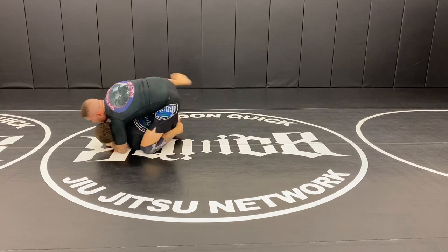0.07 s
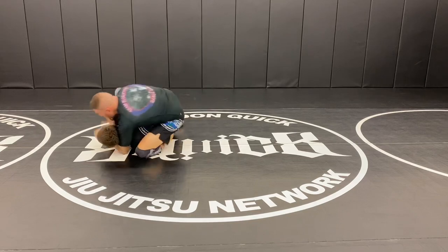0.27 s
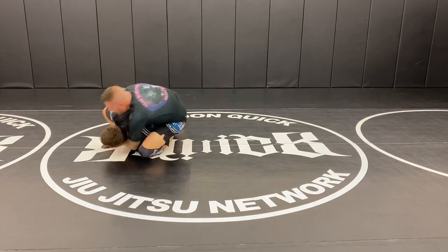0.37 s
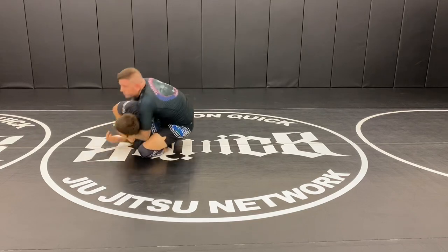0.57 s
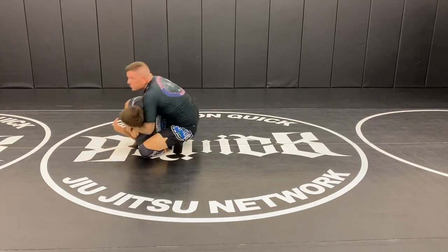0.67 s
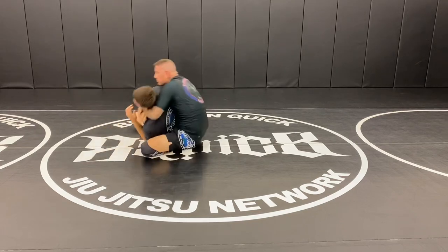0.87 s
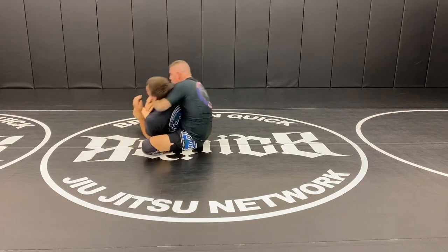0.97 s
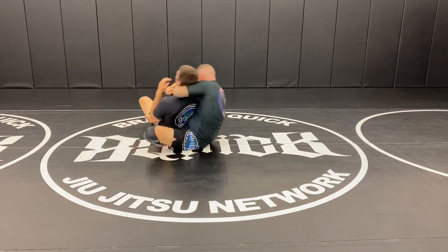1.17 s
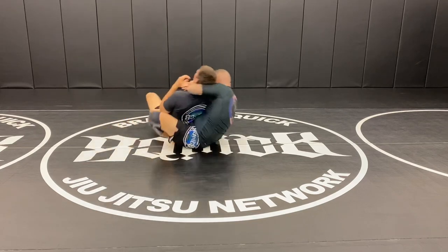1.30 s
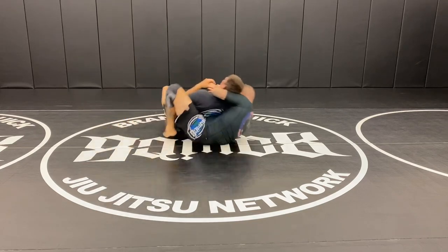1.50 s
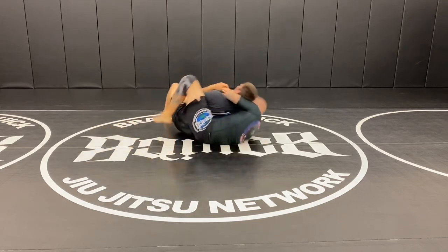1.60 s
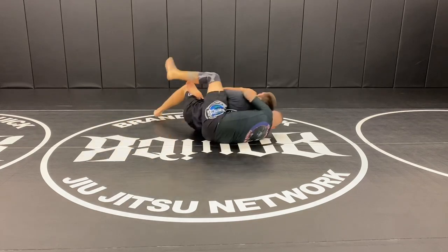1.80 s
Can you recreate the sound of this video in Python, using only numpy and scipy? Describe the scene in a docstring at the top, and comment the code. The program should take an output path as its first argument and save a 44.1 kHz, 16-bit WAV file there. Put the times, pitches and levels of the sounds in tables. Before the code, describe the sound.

Foot skid and loud slapping thud on a gym mat, followed by faint creaks and rustling

```python
"""Grapplers on a gym mat

Two grapplers on a foam mat in a padded gym: after a few soft knocks a bare foot skids on the vinyl in quick
slips, then slaps down and the sprung floor booms. Later, skin creaks in single slips and a soft thump follows.
Slips are jerks rung through the mat; creaks, knocks and thump are short falling tones; slaps are bursts of noise
and the boom is a set of fading tones. Cloth rustles as soft noise, over room air, microphone hiss, faint hum and
a low tone near 60 Hz that wavers, swelling with a small dull thud near .74 s."""
import sys
import numpy as np
from scipy import signal
from scipy.fft import rfft, irfft, next_fast_len
from scipy.io import wavfile
from scipy.ndimage import map_coordinates

SR = 44100
rng = np.random.default_rng(int(sys.argv[2]) if len(sys.argv) > 2 else 0)


def generate_wav(sig):
    """Save sig (samples, or channels by samples) to the path in sys.argv[1] as 16-bit PCM at SR."""
    pcm = np.round(np.clip(np.atleast_2d(sig).T, -1, 1) * 32767).astype(np.int16)
    wavfile.write(sys.argv[1], SR, pcm)


N = 81585  # length in samples, 1.85 s


def amp(db):
    """Turns decibels into a plain multiplier."""
    return 10 ** (np.asarray(db) / 20)


def unit(x):
    """Scales a sound to an average (rms) strength of 1."""
    return x / np.sqrt(np.mean(x ** 2) + 1e-20)


def along(points, hz):
    """Reads a curve of (frequency [Hz], value) points, joined by straight lines on a log frequency axis."""
    point_hz, values = np.transpose(points)
    return np.interp(np.log(hz + 1), np.log(point_hz + 1), values)


def wobble(rate):
    """Makes a smooth random curve through `rate` random points a second."""
    knots = rng.standard_normal(int(N * rate / SR) + 4)
    return map_coordinates(knots, [np.arange(N) * rate / SR])


def filtered(x, response):
    """Multiplies the spectrum of a sound by a response that depends on frequency."""
    size = next_fast_len(N + SR)
    hz = np.fft.rfftfreq(size, 1 / SR)
    return irfft(rfft(x, size) * response(hz), size)[..., :N]


def resonance(hz, centre_hz, width_hz):
    """Response of something that rings at one pitch: 1 at the centre, less to either side."""
    damping = 1j * hz * width_hz
    return damping / (centre_hz ** 2 - hz ** 2 + damping)


def add(track, start_s, sound):
    """Mixes a sound into a track at a given time."""
    part = track[round(start_s * SR):][:len(sound)]
    part += sound[:len(part)]


def blend(pair, alike):
    """Makes two unrelated signals alike, by sharing a middle part and giving a side part opposite signs."""
    def shares(hz):
        turn = np.arccos(np.clip(along(alike, hz), -1, 1)) / 2
        return np.array([np.cos(turn), np.sin(turn)])

    mid, side = filtered(pair, shares)
    return np.array([mid + side, mid - side])


# tone of the room air and hiss: (frequency [Hz], relative level [dB])
AIR_TONE = [(20, -55), (38, -11), (60, -15.5), (81, -7), (113, -21.5), (177, -17.5), (222, -27.5),
            (357, -24), (485, -24), (700, -39), (1500, -40), (4000, -41), (9400, -41), (10300, -45),
            (11500, -42), (12700, -64.5), (14000, -39), (15700, -58.5)]
# how alike left and right are in the air: (frequency [Hz], likeness [-1 to 1])
AIR_ALIKE = [(60, 1), (180, 0.93), (550, 0.13), (1500, 0.19), (2200, .5), (6500, 0.31), (10000, 0.75)]
# path of the low tone, with a small dull thud near .74 s: (time [s], pitch [Hz], level [dB])
LOW_TONE = [(0.0, 57, -34), (0.03, 55.2, -55), (0.184, 61.8, -36), (0.226, 62.85, -64), (0.292, 62.5, -39),
            (0.334, 61.4, -51), (0.38, 60.82, -51), (0.73, 57.6, -42), (0.756, 56.4, -36.5),
            (0.994, 54.13, -50.5), (1.07, 57.1, -47.5), (1.226, 56.2, -41), (1.328, 57.4, -49.5),
            (1.436, 64.6, -45.5), (1.462, 68.8, -57), (1.504, 63.8, -37), (1.56, 67.4, -59),
            (1.586, 65.0, -48), (1.654, 60.05, -48.5), (1.736, 61.2, -48), (1.776, 60.2, -41),
            (1.85, 63.1, -50.5)]
# faint narrow bands of hum above it: (frequency [Hz], half-width [Hz], middle level [dB])
HUM_BANDS = [(113.3, 19.5, -55.5), (354.8, 11.7, -66), (481.7, 15, -69)]
AIR_DB, HUM_WAVER_DB = -48.5, 4


def background():
    """Air and hiss are shaped noise; a low tone near 60 Hz wavers and swells with a small dull thud near .74 s;
    the faint hum above it is narrow noise."""
    air = filtered(rng.standard_normal((2, N)), lambda hz: amp(along(AIR_TONE, hz)))
    out = amp(AIR_DB) * unit(blend(air, AIR_ALIKE))

    times, pitches, levels = np.transpose(LOW_TONE)
    t = np.arange(N) / SR
    turns = np.cumsum(np.interp(t, times, pitches)) / SR
    out = out + np.sqrt(2) * amp(np.interp(t, times, levels)) * np.sin(2 * np.pi * turns)

    for centre_hz, width_hz, db in HUM_BANDS:
        band = filtered(rng.standard_normal(N), lambda hz: np.exp(-((hz - centre_hz) / width_hz) ** 2))
        out = out + amp(db + HUM_WAVER_DB * wobble(3.98)) * unit(band)
    return out


# rubs of cloth and limbs: (time of the peak [s], rise [s], fall [s], level [dB], centre [Hz])
RUBS = [(0.042, 0.09, 0.091, -51.5, 864), (0.147, 0.0019, 0.062, -47, 397), (0.801, 0.18, 0.087, -50, 556),
        (1.312, 0.099, 0.18, -64, 420), (1.444, 0.027, 0.023, -57.5, 846), (1.564, 0.035, 0.06, -50, 406),
        (1.609, 0.069, 0.095, -58.5, 1260), (1.83, 0.18, 0.054, -59.5, 430)]
# tone of a rub: (distance from the centre [octaves], relative level [dB])
CLOTH_TONE = [(-2, -24), (-.7, -6), (0, 0), (.8, -8), (1.6, -18), (3, -40), (5, -70)]
GRAINS_PER_S, GRAIN_DB = 330, -0.5  # pace and size of the fine level changes


def rustle():
    """Cloth rubbing makes slightly grainy noise that swells and fades around one pitch region."""
    out, t = 0, np.arange(N) / SR
    for peak_s, rise_s, fall_s, db, centre_hz in RUBS:
        def cloth(hz):
            octaves = np.log2((hz + 1) / centre_hz)
            return amp(np.interp(octaves, *np.transpose(CLOTH_TONE)))

        grain = amp(GRAIN_DB * wobble(GRAINS_PER_S) + 0.5 * wobble(39.5))
        pair = filtered(grain * rng.standard_normal((2, N)), cloth)
        swell = np.exp(-((t - peak_s) / np.where(t < peak_s, rise_s, fall_s)) ** 2)
        out = out + amp(db) * unit(pair) * swell
    return blend(out, [(200, 1.0), (2000, 0.15)])  # the lows are the same left and right


# slaps of skin: (time [s], starting level [dB], time to fade by 60 dB [s])
SLAPS = [(0.1387, -40.5, 0.02), (0.2694, -17.5, 0.0073), (0.2728, -23.5, 0.012), (.281, -33, 0.021)]
# tone of a slap: (frequency [Hz], relative level [dB])
SLAP_TONE = [(300, -43), (800, -6.5), (2000, -10.5), (3650, -14), (7080, -14.5), (10800, -16.5),
             (15700, -14)]


def slaps():
    """Skin hitting vinyl gives a bright crack: shaped noise that starts at once and fades fast."""
    out, t = np.zeros(N), np.arange(SR // 10) / SR
    for start_s, db, t60 in SLAPS:
        noise = filtered(rng.standard_normal(N), lambda hz: amp(along(SLAP_TONE, hz)))
        add(out, start_s, amp(db - 60 * t / t60) * unit(noise)[:len(t)])
    return out


# knocks (near .14 s), creaks and a soft thump (1.56 s):
# (time [s], relative level [dB], pitch it falls to [Hz], size of the fall [0-1])
KNOCKS_AND_CREAKS = [(.1392, -30, 400, .3), (.1425, -26, 260, .25), (.149, -29, 300, .3),
                     (.157, -31, 300, .3), (.596, -39, 430, .3), (.655, -30, 390, .7),
                     (.6825, -33, 400, .25), (.7145, -33, 410, .4), (.756, -31, 600, .2),
                     (.797, -37, 660, .1), (.82, -39, 580, .2), (1.294, -46, 620, .3),
                     (1.434, -39, 850, .5), (1.4405, -35, 520, .35), (1.561, -36, 400, .15)]
FADE_CYCLES, KNOCK_AND_CREAK_DB = 2, -1  # fade length in cycles of the final pitch; level of them all


def knocks_and_creaks():
    """Creaks, knocks and a soft thump, each a few cycles of a tone that falls in pitch."""
    out, t = np.zeros(N), np.arange(900) / SR
    for start_s, db, hz, fall in KNOCKS_AND_CREAKS:
        age = t * hz / FADE_CYCLES
        # the pitch starts at (1 + 3 * fall) times its final value
        turns = FADE_CYCLES * (age + fall * (1 - np.exp(-3 * age)))
        shape = np.exp(-age - age ** 2) * (1 - np.exp(-8 * age))
        add(out, start_s, amp(db + KNOCK_AND_CREAK_DB) * np.sin(2 * np.pi * turns) * shape)
    return out


# slips of the skidding foot: (time [s], relative level [dB])
SLIPS = [(.193, -32), (.1965, -28), (.2005, -16), (.208, -7), (.2162, -7), (.2245, -9), (.2285, -11),
         (.2325, -14), (.2352, -10), (.2395, -11), (.2445, -14), (.251, -19), (.257, -19), (.263, -23)]
# ringing of vinyl over foam: (frequency [Hz], width [Hz], relative level [dB])
MAT_RINGS = [(370, 122, -5.5), (583, 110, 1), (713, 78, -0.5), (755, 134, -4), (947, 93, -6.5),
             (1137, 217, -10), (1570, 206, -7), (2480, 860, -18.5), (3680, 2700, -26)]
SLIP_DB, SCRAPE_S, SCRAPE = 31.5, .003, .08  # level of all slips; scrape fade [s] and share of the jerk
SOLE_HZ, SOLE_WIDTH_HZ, SOLE_LEAK = 590, 556, 0.13  # shudder of the sole; share that passes around it


def skid():
    """A foot that sticks and slips: each slip is a jerk with a short scrape, rung through mat and sole."""
    jerks, t = np.zeros(N), np.arange(400) / SR
    for start_s, db in SLIPS:
        jerk = SCRAPE * rng.standard_normal(len(t)) * np.exp(-t / SCRAPE_S)
        jerk[0] = 1
        add(jerks, start_s, amp(db + SLIP_DB) * jerk)

    def body(hz):
        mat = 0
        for k, (centre_hz, width_hz, db) in enumerate(MAT_RINGS):
            mat = mat + (-1) ** k * amp(db) * resonance(hz, centre_hz, width_hz)
        sole = SOLE_LEAK + resonance(hz, SOLE_HZ, SOLE_WIDTH_HZ)
        less_bass = 1j * hz / (300 + 1j * hz)
        return mat * less_bass * sole

    return filtered(jerks, body)


# weight landing on the floor: (time [s], relative level [dB], length of the push [s])
LANDINGS = [(.2705, -19.5, 0.0016), (.278, -14.5, 0.0021), (.294, -19, .003), (.32, -25.5, 0.0052),
            (.352, -23.5, 0.0033)]
# boom tones of floor and room: (frequency [Hz], relative level [dB], time to fade by 60 dB [s])
FLOOR_TONES = [(62.6, -7, .4), (85.6, -11, 1), (102.2, -10.5, 1), (114, -32, 0.15), (125.8, -4, 0.28),
               (147, -14.5, 0.97), (170, 6.5, 0.11), (179.5, 0.5, 0.41), (193.1, -9.5, 0.94),
               (211.2, -5, 0.65), (244.5, -6.5, 0.169), (329, 0.5, 0.11), (433, -5.5, 0.31)]
RISE_CYCLES = .6  # each tone builds up over about this many cycles


def landings():
    """Landing weight is a soft push that sets the floor tones booming, each fading at its own speed."""
    out, t = np.zeros(N), np.arange(SR) / SR
    for start_s, landing_db, push_s in LANDINGS:
        boom = np.zeros(len(t))
        for k, (hz, db, t60) in enumerate(FLOOR_TONES):
            rise = 1 - np.exp(-t * hz / RISE_CYCLES)
            # every landing strikes each tone a little differently
            fade = amp(db + rng.normal(0, 1) - 60 * t / t60)
            boom += (-1) ** k * rise * fade * np.sin(2 * np.pi * hz * t)
        push = np.hanning(max(round(push_s * SR), 3))
        add(out, start_s, amp(landing_db) * signal.fftconvolve(boom, push / push.sum()))
    return out


# how long the gym rings: (frequency [Hz], time to fade by 60 dB [s])
GYM_FADE = [(100, 1), (400, 0.53), (1500, 0.77), (5000, 1), (12000, 0.46)]
# strength of the room sound: (frequency [Hz], level against the direct sound [dB])
GYM_LEVEL = [(100, -6.5), (250, -8.5), (500, -5.5), (2000, 0), (6000, 0.5), (14000, -6)]
# how alike left and right are in the room sound: (frequency [Hz], likeness [-1 to 1])
GYM_ALIKE = [(100, .995), (400, 0.35), (1500, 0.1), (6000, 0.32), (10000, 0.28)]


def gym(x):
    """Echoes blur into a tail of fading noise, in which each frequency dies at its own speed."""
    hz, t, noise = signal.stft(rng.standard_normal((2, SR)), SR, nperseg=256)
    fade = amp(-60 * t / along(GYM_FADE, hz)[:, None])
    fade = fade / np.sqrt(np.sum(fade ** 2, axis=1, keepdims=True))  # equal energy at every frequency
    fade = fade * amp(along(GYM_LEVEL, hz))[:, None]
    tail = signal.istft(noise * fade, SR, nperseg=256)[1] / np.sqrt(128)
    delayed = np.pad(x, (300, 0))[None]  # the room answers 300 samples late, about 7 ms
    return blend(signal.fftconvolve(delayed, tail, axes=1)[:, :N], GYM_ALIKE)


def scene():
    """Adds the body sounds, their echo in the gym, the rustle and the background."""
    near = skid() + knocks_and_creaks() + slaps() + landings()
    return near + gym(near) + rustle() + background()


# level difference of the ports: (frequency [Hz], left over right [dB])
PORT_LEVEL = [(150, -1), (500, 1), (4000, 2), (7000, 3.5), (8500, 0)]
# phase difference of the ports: (frequency [Hz], left ahead of right [radians])
PORT_PHASE = [(1600, 0.26), (2900, 1.5), (5500, 0.57), (6800, 0), (8500, -3), (10200, -7.5), (12100, -9.5),
              (13800, -11), (15700, -13)]
BASS_CUT_HZ, TOP_HZ = 19.6, 15700


def record(dry):
    """Two microphone ports differ in level and phase; deep bass is weakened and the top is cut off."""
    def ports(hz):
        left = amp(along(PORT_LEVEL, hz) / 2) * np.exp(.5j * along(PORT_PHASE, hz))
        bass_cut = (1j * hz / (BASS_CUT_HZ + 1j * hz)) ** 2
        return np.array([left, 1 / left]) * bass_cut * (hz < TOP_HZ)

    return filtered(dry, ports)


dry = scene()
out = record(dry)
generate_wav(out)
```